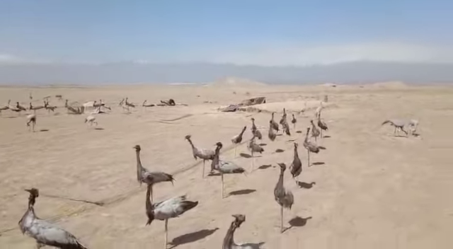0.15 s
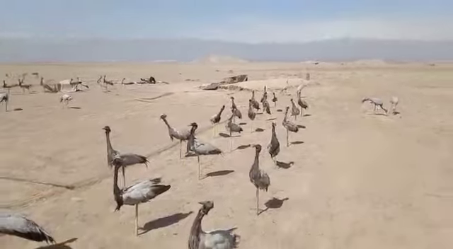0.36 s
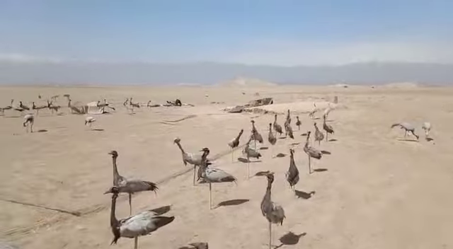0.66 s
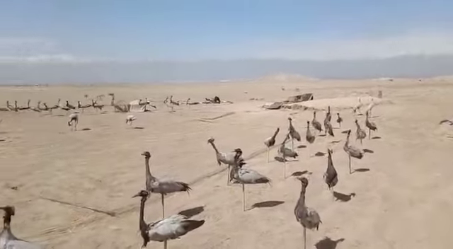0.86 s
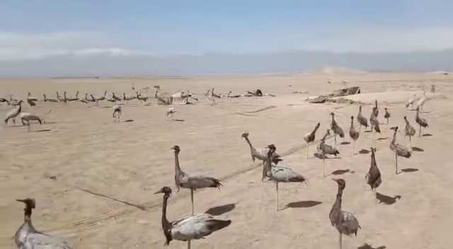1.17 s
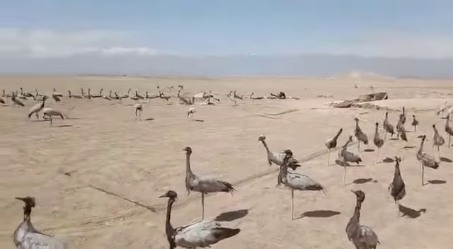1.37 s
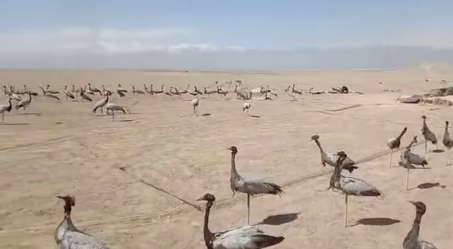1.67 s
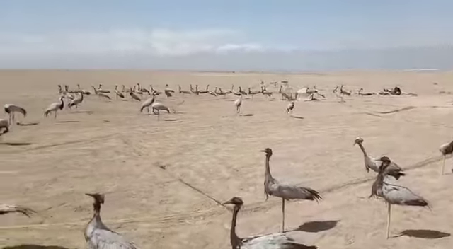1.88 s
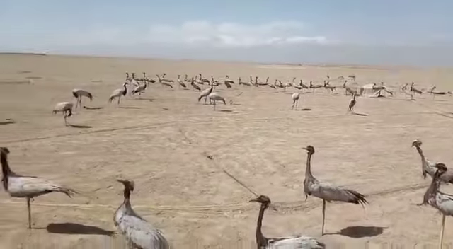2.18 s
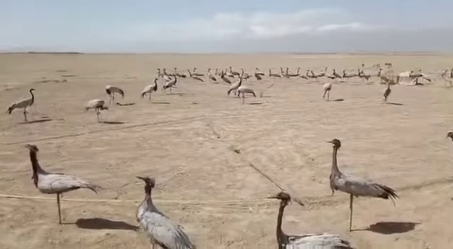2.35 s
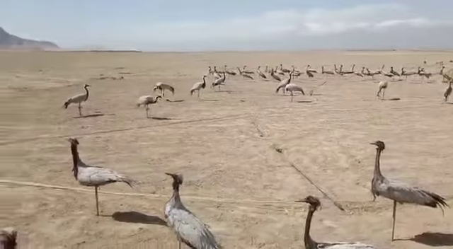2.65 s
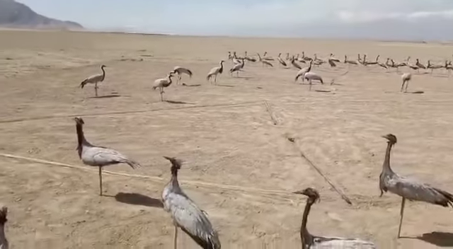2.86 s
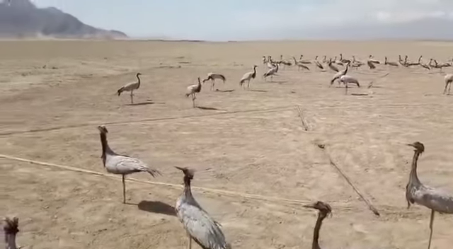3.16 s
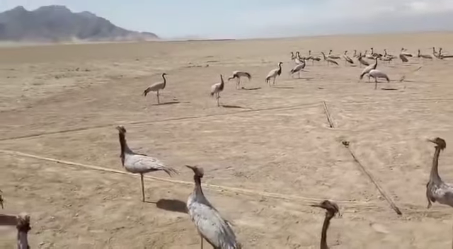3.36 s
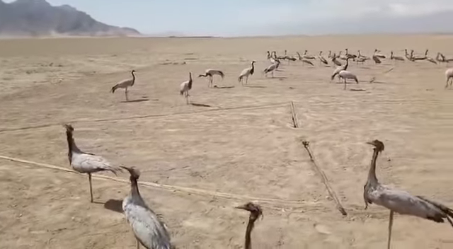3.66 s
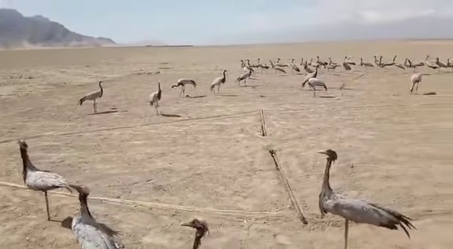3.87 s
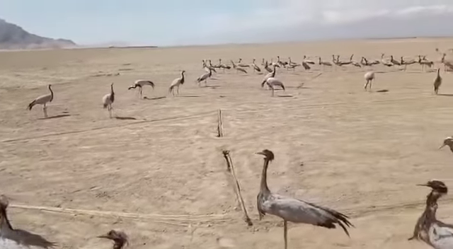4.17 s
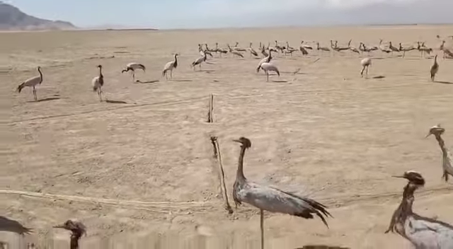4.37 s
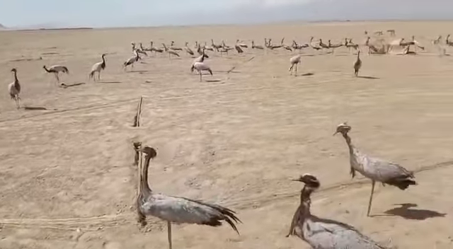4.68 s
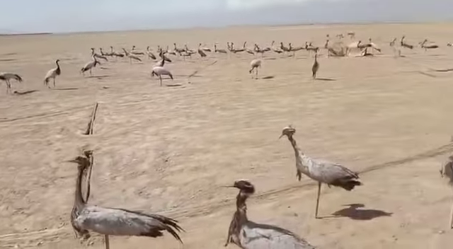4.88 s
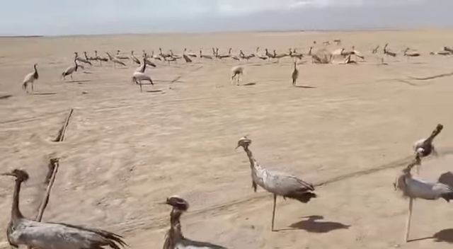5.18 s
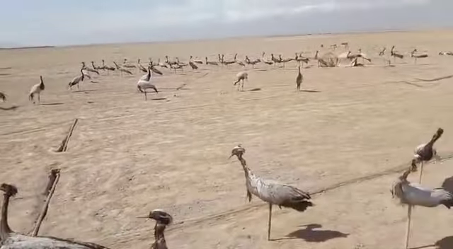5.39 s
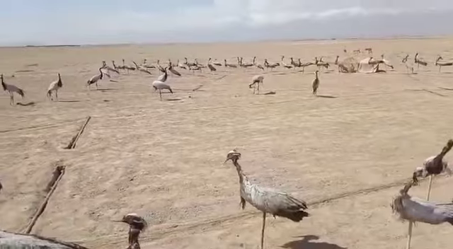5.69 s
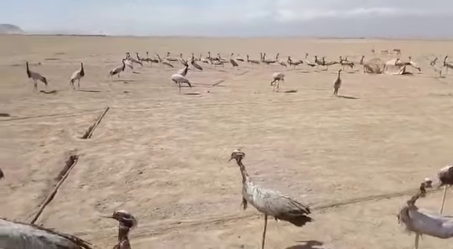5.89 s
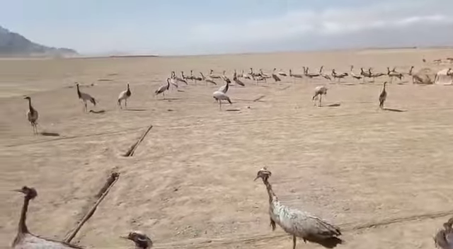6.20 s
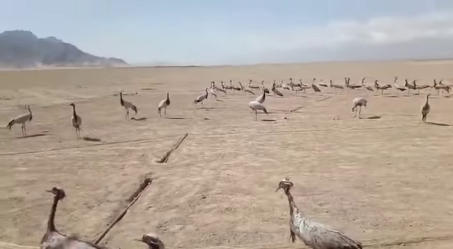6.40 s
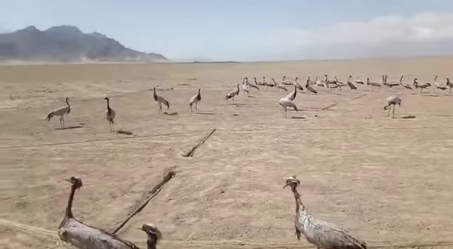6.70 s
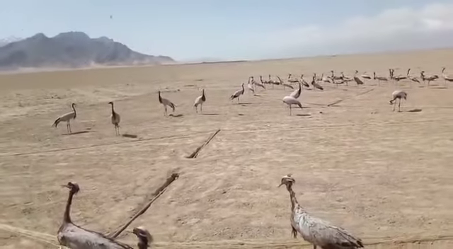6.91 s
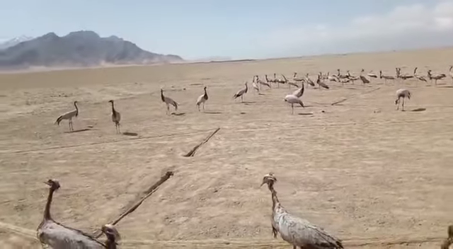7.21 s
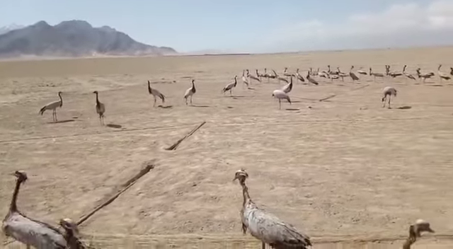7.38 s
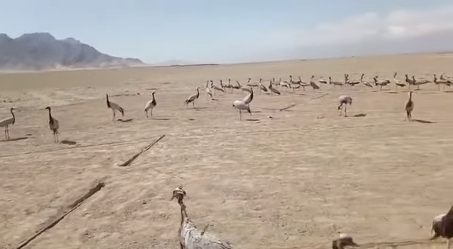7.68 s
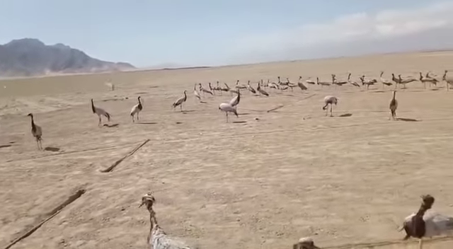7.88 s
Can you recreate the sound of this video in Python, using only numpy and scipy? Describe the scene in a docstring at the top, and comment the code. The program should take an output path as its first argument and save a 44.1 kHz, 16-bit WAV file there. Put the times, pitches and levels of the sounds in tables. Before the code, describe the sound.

Short throaty crane trills close by, one every second or so, with softer purrs and far flock calls between, over quiet wind rumble.

```python
"""Rolling crane trills, near at hand, swell, then sag in pitch and go hoarse as the birds tire.
Each is a train of air puffs that sound a syrinx membrane: a fundamental, overtones and air noise.
Far calls, some ending in low falling voices, soft purrs, a soft, bright rattle within one far call
and two squawks reuse that membrane; rough ground and an airy hiss trail them all.
Gusts of low noise rumble on the microphone over a plain's faint hush, with a pressure-pulse tick,
a few soft noise rustles and a thin sine whistle."""
import sys
import numpy as np
from scipy import signal
from scipy.fft import rfft, irfft, next_fast_len
from scipy.io import wavfile
from scipy.ndimage import map_coordinates

SR = 44100
rng = np.random.default_rng(int(sys.argv[2]) if len(sys.argv) > 2 else 0)


def put_to_file(sound):
    """Save the sound as 16-bit audio at rate SR, in the file named by the first command-line argument."""
    columns = np.atleast_2d(sound).T  # one column per channel
    safe = np.clip(columns, -1, 1)
    whole_steps = np.round(safe * 32767)
    wavfile.write(sys.argv[1], SR, whole_steps.astype(np.int16))


N = 355005
TIME = np.arange(N) / SR
LEAD_S = .014   # a throb's sound begins this long before its main puff
TAUT_HZ = 1397.5   # a membrane at this pitch is clear; lower ones are hoarser

# Windpipe and beak resonance above the fundamental. Each row: frequency in Hz, gain in dB.
TRILL_RESONANCE = [(1900, 7.5), (2650, 4), (3500, -4), (4500, -10.5), (5500, 4), (6600, -5.5), (8300, -23),
                   (13500, -35), (16000, -36)]
# The same for a squawk's wide-open beak. Each row: frequency in Hz, gain in dB.
SQUAWK_RESONANCE = [(1700, -8), (2700, 0), (3900, -15), (5400, 2.5), (6100, 2.5), (8400, -23),
                    (11300, -33.5), (13300, -19), (16000, -41.5)]


def from_db(db):
    """Level is logarithmic: 20 dB is a tenfold change of amplitude."""
    return 10 ** (np.asarray(db) / 20)


def rms_one(x):
    """Normalise the root-mean-square amplitude to 1."""
    return x / np.sqrt(np.mean(x ** 2) + 1e-20)


def curves(rows, t):
    """Linear interpolation: each column after the first, which holds times, is read at times t."""
    s, *columns = np.transpose(rows)
    return [np.interp(t, s, c) for c in columns]


def gain_at(colour, hz):
    """Spectral envelope: gain, in dB against log frequency, joined by straight lines."""
    points, db = np.transpose(colour)
    return from_db(np.interp(np.log(hz + 1), np.log(points), db))


def noise(colour, size):
    """Spectral shaping: white noise weighted by frequency, scaled to rms 1."""
    padded = next_fast_len(size)
    hz = np.fft.rfftfreq(padded, 1 / SR)
    spectrum = rfft(rng.standard_normal(padded)) * gain_at(colour, hz)
    return rms_one(irfft(spectrum, padded)[:size])


def drift(rate, size):
    """Band-limited fluctuation: random values about zero, rate of them a second, joined by splines."""
    at = np.arange(size) * rate / SR
    return map_coordinates(rng.standard_normal(int(at[-1]) + 3), [at], order=3, mode="nearest")


def cut(x, hz, kind, order=2):
    """Butterworth filtering: a maximally flat pass band."""
    return signal.sosfilt(signal.butter(order, hz, kind, fs=SR, output="sos"), x)


def add(out, start_s, sound):
    """Superposition: pressures add, here from the sound's start time on."""
    at = round(start_s * SR)
    first, last = np.clip([at, at + len(sound)], 0, N)
    out[first:last] += sound[first - at:last - at]


def cycles_at(per_s, jitter, jitter_rate):
    """Phase is the integral of frequency: the running cycle count of an unsteady oscillator."""
    unsteady_per_s = per_s * (1 + jitter * drift(jitter_rate, len(per_s)))
    return np.cumsum(unsteady_per_s) / SR


def arch(share):
    """Parabolic contour: 0 in the middle of a call, 1 at both ends."""
    return (2 * share - 1) ** 2


def throb_times(length_s, period_s, unsteady_s=.0007):
    """Quasi-periodic pulsing: nearly regular throb times from the start of a call."""
    t = np.arange(round(length_s / period_s) + 1) * period_s
    return t + unsteady_s * rng.standard_normal(len(t))


def syrinx(cycles, pitch_hz, throat, rasp, hiss_edge_hz=1850):
    """Source and filter: a membrane's fundamental, and throat-coloured overtones mixed with air noise."""
    orders = np.arange(2, 13)[:, None]
    harmonics = gain_at(throat, orders * pitch_hz) * np.sin(2 * np.pi * orders * cycles)
    stack = np.sum(harmonics, axis=0)
    hiss = cut(noise(throat, len(cycles)), hiss_edge_hz, "high", order=4)
    overtones = rms_one(rms_one(stack) + rasp * rms_one(hiss))
    return np.sin(2 * np.pi * cycles), overtones / np.sqrt(2)   # as strong as the unit sine


def throb(puffs_db, spacing_s, width_s, pitch_hz, overtones_db, jitter, rasp, sag=.03, bend=.08):
    """Pulsed excitation: each puff sounds the syrinx anew, bending up within it and sagging to the next."""
    t = np.arange(int(.055 * SR)) / SR - LEAD_S
    # a gaping beak is shriller
    throat = SQUAWK_RESONANCE if overtones_db > 2 else TRILL_RESONANCE
    sagging_hz = pitch_hz * (1 + sag * (.5 - t / spacing_s).clip(-2, 1))
    out = np.zeros(len(t))
    for k, level_db in enumerate(puffs_db, -1):   # a weak puff leads the throb
        # puff 0 is on time, the others a little irregular
        centre = spacing_s * (k + abs(np.sign(k)) * rng.normal(0, .09))
        opening = np.exp(-.5 * ((t - centre) / width_s) ** 2)
        bent_hz = sagging_hz * (1 + bend * (opening - .8))
        cycles = cycles_at(bent_hz, jitter, 900) + rng.random()
        tone, overtones = syrinx(cycles, bent_hz, throat, rasp)
        # only a hard-blown membrane is rich in overtones
        effort_db = 0.64 * (level_db - max(puffs_db))
        rich = from_db(overtones_db + effort_db) * opening ** 0.967 * overtones
        out += from_db(level_db) * (opening * tone + rich)
    return out


def trills(uneven_db=1.9252, uneven_hz=28, puff_fall_db=10.0):
    """Effort sets tension: pitch follows a swell and fade; slack membranes are hoarse, their puffs merge."""
    # Near trills. Each row: start in seconds, length in seconds, top pitch in Hz, nominal peak in dB,
    # swell from the start in dB, fade by the end in dB, second puff in dB re the first,
    # overtones in dB re the fundamental before slackness brightens them.
    near_trills = [(-0.139, 0.2298, 1273, -12.5, 8, 17.5, -4, 4.5),
                   (1.332, 0.3647, 1313, -11.5, 7.5, 22, -2, -6),
                   (1.988, 0.25, 1294, -13, 12.5, 24, -5, -2),
                   (3.209, 0.2415, 1364, -7.5, 7.5, 16, -2.5, -9.5),
                   (4.413, 0.2448, 1347, -9, 8, 15, -1.5, -8.5), (5.518, 0.2696, 1344, -10, 7.5, 8, -3, -4),
                   (5.764, 0.17, 1229, -15, 1.5, 28.5, -4, -6), (6.502, 0.2728, 1337, -12, 8.5, 16, 1, -10),
                   (8.028, 0.23, 1360, -12.5, 7.5, 16, -5, -8)]
    throb_s, swell_s = .0284, 0.057   # about 35 throbs a second; time to swell to the peak
    fade_curve = 2.1   # above 1, the fade runs ever faster
    sag_hz_per_db = 15.5
    slack_range_hz = 263.5   # fully hoarse this far below the taut pitch
    out = np.zeros(N)
    for start_s, length_s, top_hz, peak_db, swell_db, fade_db, second_db, overtones_db in near_trills:
        for t in throb_times(length_s, throb_s):
            swelling = max(1 - t / swell_s, 0) ** 2
            fading = (max(t - swell_s, 0) / (length_s - swell_s)) ** fade_curve
            effort_db = -swell_db * swelling - fade_db * fading
            pitch_hz = top_hz + sag_hz_per_db * effort_db + uneven_hz * rng.standard_normal()
            slack = np.clip((TAUT_HZ - pitch_hz) / slack_range_hz, 0, 1) * (1 - swelling)
            fall_db = puff_fall_db - 6 * slack
            puffs_db = np.array([-28.5, 0, second_db, second_db - fall_db, second_db - 2 * fall_db])
            puffs_db = puffs_db + peak_db + effort_db + uneven_db * rng.standard_normal(len(puffs_db))
            sound = throb(puffs_db, spacing_s=.007, width_s=0.0011 + 0.0015 * slack, pitch_hz=pitch_hz,
                          overtones_db=overtones_db + 1.2 * slack,
                          jitter=.02 + .1 * slack, rasp=.5 + .7 * slack)
            add(out, start_s + t - LEAD_S, sound)
    return out


def ground_scatter(calls, wet_db=-12.0, t60_s=0.075, dull_hz=4500):
    """Diffuse scattering: rough ground throws back a faint, dull tail that decays exponentially."""
    t = TIME[:SR // 2]
    dull_noise = cut(rng.standard_normal(len(t)), dull_hz, "low", order=1)
    tail = dull_noise * from_db(-60 * t / t60_s) * (t > .002)
    return from_db(wet_db) * signal.fftconvolve(calls, tail / np.linalg.norm(tail))[:N]


def lingering_hiss(calls, linger_db=-41.0, t60_s=1.4):
    """Exponential decay: a faint, airy treble hiss hangs on after each call."""
    t = TIME[:2 * SR]
    tail = cut(rng.standard_normal(len(t)), [5000, 6800], "band") * from_db(-60 * t / t60_s)
    return from_db(linger_db) * signal.fftconvolve(calls, tail / np.linalg.norm(tail))[:N]


def plain_hush(level_db=-79):
    """Stationary background: steady coloured noise makes the faint hush of the plain."""
    # Colour of the hush. Each row: frequency in Hz, gain in dB.
    hush_colour = [(40, 6), (900, -5.5), (1300, -3.5), (2000, -15.5), (4500, -17), (5400, -9),
                   (6600, -10.5), (9000, -34)]
    return from_db(level_db) * noise(hush_colour, N)


def gust_level_db():
    """Attack, ease and release: a gust rises quickly, eases off, then drops back to the breeze."""
    # Gusts on the microphone. Each row: start in seconds, length in seconds,
    # level in dB before lumps and filtering.
    gust_rows = [(0.46, 0.966, -39), (1.5, 0.32, -46), (1.9, 0.269, -52), (2.434, 0.136, -50.5),
                 (3.699, 0.161, -62.5), (4.325, 0.817, -67.5), (5.032, 0.2914, -52.5),
                 (5.54, 0.4605, -46.5), (6.096, 0.6, -49.5), (6.546, 0.2904, -40), (6.897, 0.45, -56),
                 (7.357, 0.1685, -43.5), (7.657, 0.0925, -54.5), (8.037, 0.102, -46)]
    breeze_db = -84   # between gusts
    rise_db_per_s, ease_db_per_s, fall_db_per_s = 322, 1.5, 166.5
    level_db = np.full(N, float(breeze_db))
    for start_s, length_s, peak_db in gust_rows:
        t = TIME - start_s
        loss_db = np.maximum(-rise_db_per_s * t, ease_db_per_s * t)
        loss_db = loss_db + fall_db_per_s * np.maximum(t - length_s, 0)
        level_db = np.maximum(level_db, peak_db - loss_db)
    return level_db


def wind(eddy_onset_db=-43.0):
    """Turbulence: gusts buffet the microphone in lumps; stronger ones shed smaller, higher eddies."""
    # Colour of the buffeting. Each row: frequency in Hz, gain in dB.
    buffet_colour = [(25, -25.5), (50, -7), (80, 4), (130, 0), (200, -22.5), (700, -68)]
    # Colour of the small eddies in strong gusts. Each row: frequency in Hz, gain in dB.
    eddy_colour = [(70, -24.5), (150, 3), (230, -8), (330, -17.5), (900, -57.5)]
    level_db = gust_level_db()
    lumps_db = 8.5 * np.tanh(.8 * drift(20, N)) - 3.5
    eddies = from_db(0.92 * (level_db - eddy_onset_db) - 3.5) * noise(eddy_colour, N)
    buffeting = from_db(level_db + lumps_db) * (noise(buffet_colour, N) + eddies)
    return cut(cut(buffeting, 900, "low", order=3), 32, "high")


def far_calls(level_trim_db=1.5, overtones_db=-21.5, puffs_per_s=155, throbs_per_s=33,
              throb_db=4.5, chirp=0.051, uneven_db=5.0):
    """Joint amplitude and frequency modulation: blurred throbs slide down; the low harmonics carry."""
    # Distant calls, and the low falling voices that end some calls. Each row: start in seconds,
    # length in seconds, peak in dB before the trim, mid pitch in Hz, glide in Hz.
    distant_voices = [(0.125, 0.104, -39, 1373, -100), (0.389, 0.3094, -42, 1228, 380.5),
                      (0.741, 0.197, -38.5, 1350, -100), (0.91, 0.292, -34, 1362, 143.5),
                      (1.194, 0.188, -37, 1430, 157.5), (1.614, 0.237, -55, 853.6, -250),
                      (2.488, 0.206, -42, 1415, 7), (2.97, 0.1564, -57, 820, -220),
                      (3.019, 0.1737, -53, 1256, 46.5), (3.441, 0.2454, -43, 1372, -280),
                      (3.811, 0.1402, -42, 1451, -130), (4.197, 0.22, -41.5, 1325, -12.5),
                      (5.068, 0.253, -39, 1444, 187), (5.27, 0.1476, -52.5, 860, -350),
                      (5.869, 0.2083, -48.5, 1168, -84.5), (7.285, 0.2948, -44, 1345, -69),
                      (7.301, 0.234, -54.5, 880.4, -170)]
    edge_db, arch_hz = 3.5, 74.1   # softer and lower by this much at both ends
    out = np.zeros(N)
    for start_s, length_s, peak_db, mid_hz, glide_hz in distant_voices:
        share = np.linspace(0, 1, int(length_s * SR))
        throbs = 2 * np.pi * cycles_at(np.full(len(share), throbs_per_s), .1, 20)
        contour_hz = mid_hz + glide_hz * (share - .5) - arch_hz * arch(share)
        pitch_hz = contour_hz * (1 + chirp * np.cos(throbs))
        level_db = peak_db + level_trim_db - edge_db * arch(share)
        swell = from_db(level_db) * signal.windows.tukey(len(share), .25)
        puffs = cycles_at(np.full(len(share), puffs_per_s), .13, 120)
        opening = puff_train(puffs, sharpness=0.571)
        jitter = 0.015 * (TAUT_HZ / pitch_hz) ** 2   # hoarser when low
        cycles = cycles_at(pitch_hz, jitter, 350)
        tone, overtones = syrinx(cycles, pitch_hz, TRILL_RESONANCE, rasp=0.15)
        roll = from_db(throb_db * np.sin(throbs) + uneven_db * drift(19, len(share)))
        add(out, start_s, swell * opening * roll * (tone + from_db(overtones_db) * overtones))
    return cut(out, 3100, "low", order=7)


def puff_train(puffs, sharpness):
    """Periodic gating: the syrinx opens once a puff, rms 1 before the soft ends are applied."""
    opening = np.exp(-sharpness * (1 + np.cos(2 * np.pi * puffs)))
    rms = np.sqrt(np.i0(2 * sharpness) * np.exp(-2 * sharpness))
    return opening / rms * signal.windows.tukey(len(puffs), .03)


def tick(time_s=0.1405, peak_db=-5.5, width_s=0.0001728):
    """Pressure pulse: the slope of a Gaussian swings down and up, with a tiny noise snap on it."""
    u = (TIME - time_s) / width_s
    return from_db(peak_db) * np.exp(.5 * (1 - u ** 2)) * (u + .08 * rng.standard_normal(N))


def rustle():
    """Noise bursts: coloured noise under a smooth bell makes short, soft swishes."""
    # Soft rustles. Each row: start in seconds, length in seconds, level in dB before the bell.
    swishes = [(0.182, 0.2388, -45), (4.123, 0.1594, -58), (7.908, 0.075, -63.5)]
    # Colour of the swishes. Each row: frequency in Hz, gain in dB.
    swish_colour = [(300, -7), (1500, 0), (3600, 0), (6500, -5), (8500, -23.5), (15000, -17)]
    out = np.zeros(N)
    for start_s, length_s, level_db in swishes:
        size = int(length_s * SR)
        add(out, start_s, from_db(level_db) * np.hanning(size) * noise(swish_colour, size))
    return out


def purrs(puffs_db=(-12.0, 1.5, 3.0, 1.5, -3.0, -8.0)):
    """Pulsed excitation at low effort: mostly slower, lower throbs whose puffs swell and fade."""
    # Purring calls, and a soft, bright rattle within one far call. Each row: start in seconds,
    # length in seconds, throb period in seconds, level in dB before the puff levels,
    # mid pitch in Hz, glide in Hz, overtones in dB re the fundamental.
    soft_throbbing = [(0.46, 0.185, 0.031, -44, 1212, 199.5, -2.5),
                      (1.176, 0.124, 0.0376, -33, 1131, 68, -2),
                      (1.712, 0.0693, 0.0269, -42, 1019, -90, -3),
                      (2.659, 0.1744, 0.03794, -37, 1130, -120, -3),
                      (2.872, 0.1364, 0.0288, -36, 1078, -110, -9),
                      (3.684, 0.1892, 0.0339, -36.5, 1072, 51.5, -1),
                      (4.861, 0.198, 0.0332, -32, 1126, 74, -1),
                      (5.184, 0.136, 0.02963, -29.5, 1115, -81, -10),
                      (6.088, 0.1728, 0.03817, -37, 1120, -28.5, 2)]
    edge_db, arch_hz = 6, 88.25   # softer and lower by this much at both ends
    out = np.zeros(N)
    for start_s, length_s, period_s, peak_db, mid_hz, glide_hz, overtones_db in soft_throbbing:
        for t in throb_times(length_s, period_s):
            share = t / length_s
            level_db = peak_db - edge_db * arch(share)
            pitch_hz = mid_hz + glide_hz * (share - .5) - arch_hz * arch(share)
            sound = throb(level_db + np.array(puffs_db), spacing_s=.00642, width_s=0.00193,
                          pitch_hz=pitch_hz, overtones_db=overtones_db, jitter=0.11, rasp=0.067)
            add(out, start_s + t - LEAD_S, sound)
    return cut(out, 5500, "low", order=1)


def squawks(clear_db=-3.0):
    """Phase-locked excitation: crisp puffs buzz at their own rate; as they slow, a clear tone emerges."""
    # One group per squawk. Each row: time in seconds, puffs per second, pitch in Hz, level in dB,
    # overtones in dB re the fundamental.
    squawk_paths = [
        [(2.4035, 116, 1406, -21, -10.5), (2.45, 115, 1352, -16, -9), (2.499, 118, 1220, -29.5, -5.5)],
        [(4.661, 146, 1073, -29, 14.5), (4.72, 141, 970, -29.5, 16.5), (4.76, 88, 872, -32.5, 18.5),
         (4.80, 83, 837, -29, 8.5), (4.823, 107, 740, -28, 10)],
    ]
    out = np.zeros(N)
    for rows in squawk_paths:
        t = np.arange(rows[0][0], rows[-1][0], 1 / SR)
        per_s, pitch_hz, level_db, overtones_db = curves(rows, t)
        puffs = cycles_at(per_s, .005, 120)
        slowing = 1 - per_s / per_s.max()
        opening = puff_train(puffs, sharpness=1.48 * (1 - slowing) ** 1.6)
        # every puff starts the membrane alike, so the squawk buzzes at the puff rate
        locked_cycles = (puffs % 1 - .5) * pitch_hz / per_s
        tone, overtones = syrinx(locked_cycles, pitch_hz, SQUAWK_RESONANCE, rasp=1.0)
        buzz = opening ** 0.735 * tone + from_db(overtones_db) * opening * overtones
        # between slow puffs the membrane keeps swinging, in its second and third harmonics
        phase = 2 * np.pi * cycles_at(pitch_hz, .006, 400)
        clear = (np.sin(2 * phase) + .5 * np.sin(3 * phase)) * signal.windows.tukey(len(t), .1)
        share = np.clip(2 * slowing, 0, 1)
        mixed = np.sqrt(1 - .5 * share) * buzz + 2 * from_db(clear_db) * share * clear
        add(out, t[0], from_db(level_db) * mixed)
    return out


def whistle():
    """Frequency glide: a thin, slightly unsteady sine slides up and holds."""
    # Path of the whistle. Each row: time in seconds, pitch in Hz, level in dB.
    whistle_path = [(2.692, 2990, -56), (2.77, 3427, -60.5), (3.15, 3460, -72.5)]
    t = np.arange(whistle_path[0][0], whistle_path[-1][0], 1 / SR)
    pitch_hz, level_db = curves(whistle_path, t)
    tone = np.sin(2 * np.pi * cycles_at(pitch_hz, 0.0033, 200))
    out = np.zeros(N)
    add(out, t[0], from_db(level_db) * tone * signal.windows.tukey(len(t), .1))
    return out


def scene():
    """Superposition: the flock, its scattered tails, the plain, the wind and the small noises add up."""
    calls = cut(trills() + far_calls() + purrs() + squawks(), 440, "high", order=5)
    air = ground_scatter(calls) + lingering_hiss(calls) + plain_hush()
    return (calls + air + wind() + tick() + rustle() + whistle())[None]


def record(dry, ceiling=.8, cutoff_hz=15900):
    """Soft saturation and band limiting: peaks round off below a ceiling, then the top is cut steeply."""
    rounded = dry / (1 + (dry / ceiling) ** 8) ** (1 / 8)
    return signal.sosfilt(signal.ellip(10, .1, 90, cutoff_hz, fs=SR, output="sos"), rounded)


dry = scene()
out = record(dry)
put_to_file(out)
```